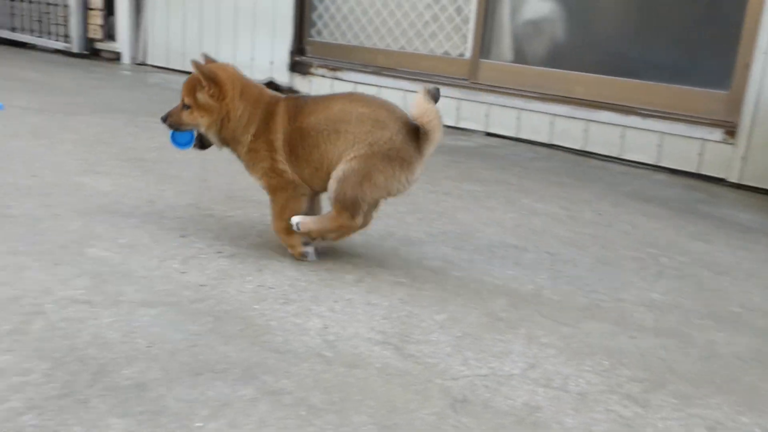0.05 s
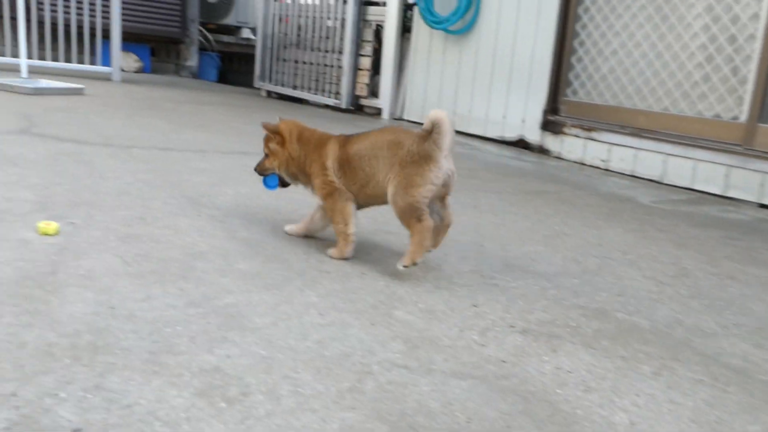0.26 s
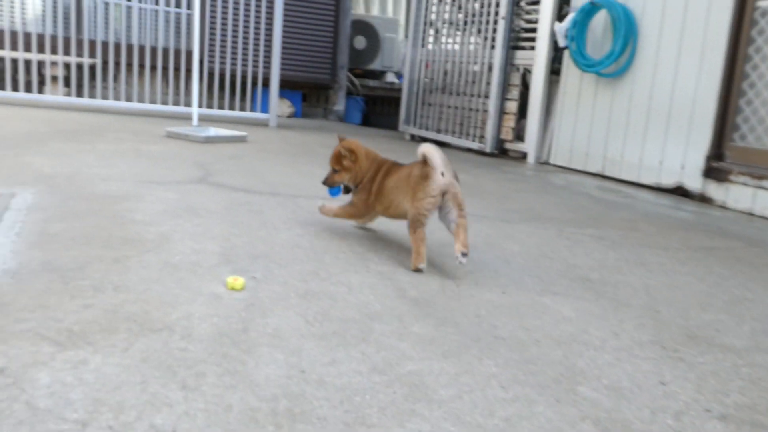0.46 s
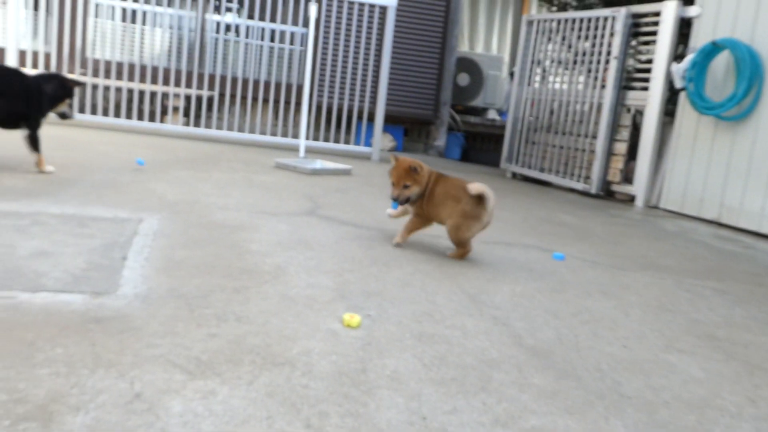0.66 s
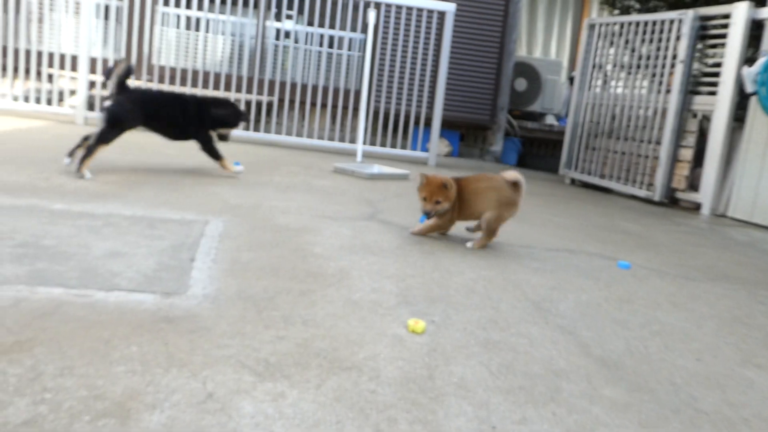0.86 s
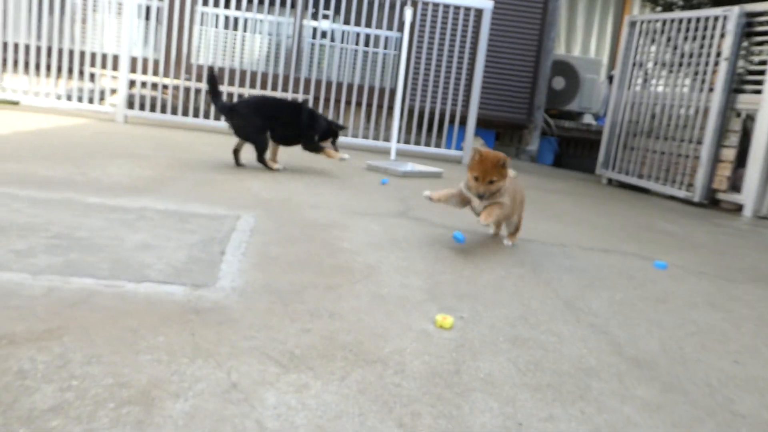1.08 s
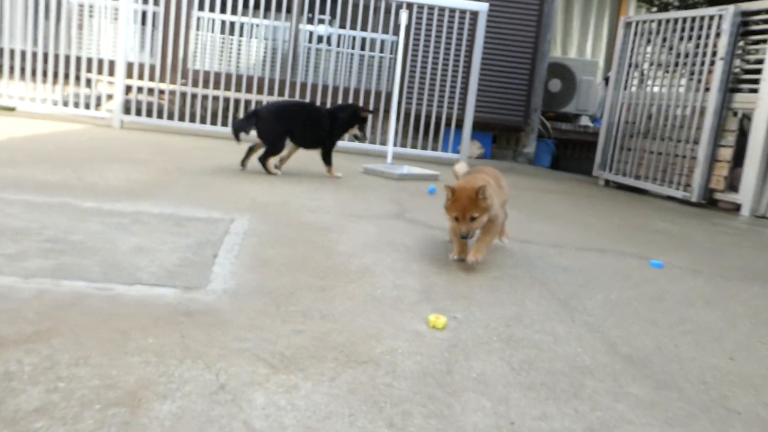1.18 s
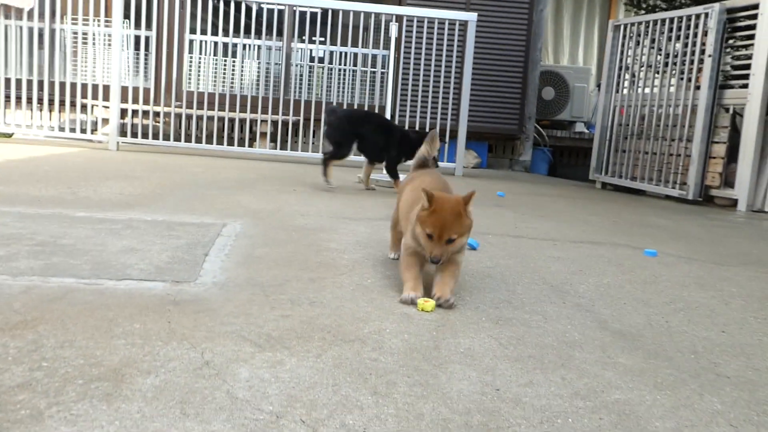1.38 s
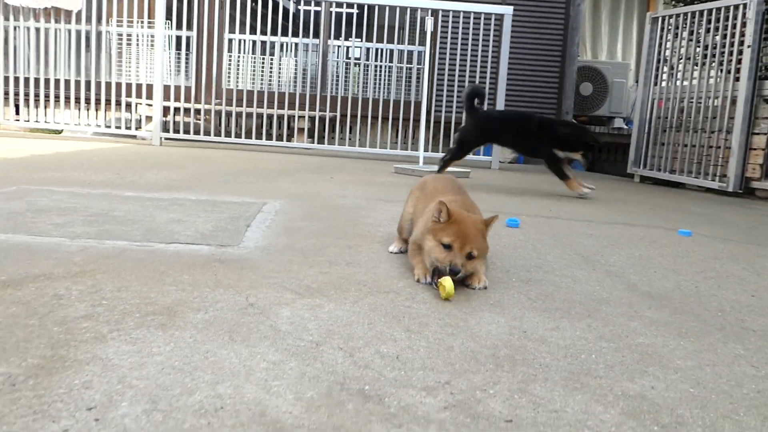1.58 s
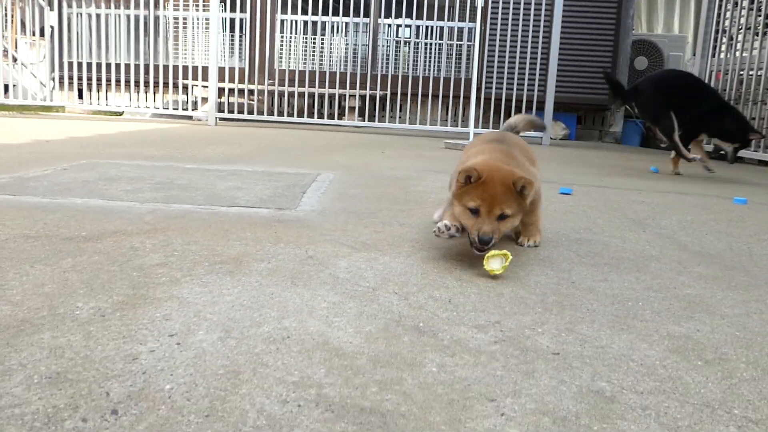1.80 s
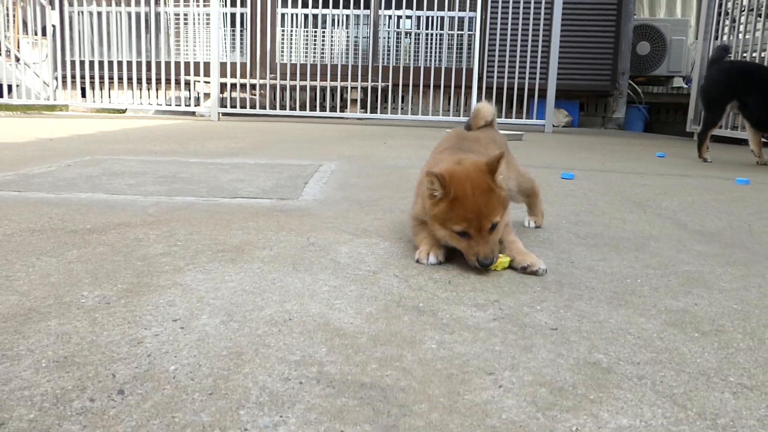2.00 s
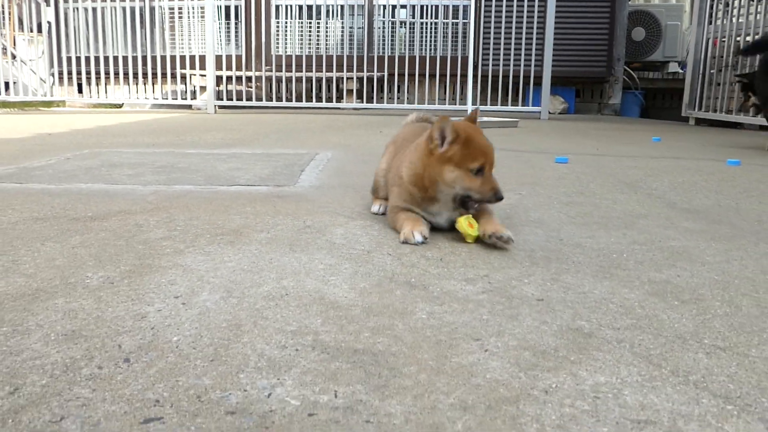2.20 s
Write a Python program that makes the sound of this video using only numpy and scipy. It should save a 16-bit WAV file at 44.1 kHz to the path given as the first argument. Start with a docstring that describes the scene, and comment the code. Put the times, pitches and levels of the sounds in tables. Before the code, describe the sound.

A hollow plastic bottle cap clacks irregularly in a puppy's mouth, loudest around 1 and 1.6 seconds, with short wall echoes. Paws scuff and claws tick on concrete, moving from left to right. A cap slides with a faint squeak at 1.4 seconds, then a second cap knocks dully, strongest near 2 seconds. Teeth creak softly on plastic just after. Quiet outdoor noise and a faint hum continue underneath.

```python
"""A puppy pads into a run about a walled concrete yard, over soft outdoor noise and a faint hum.
Its paws scuff and its claws tick; the hollow plastic bottle cap in its mouth clacks and rings briefly.
The walls answer every click, and the loudest ones push the recorder's limiter down.
As the puppy moves from left to right, a cap slides with a faint squeak; then it paws at a second cap,
which knocks dully on the ground. Near the end its teeth drag over the plastic in soft creaks."""
import sys
import numpy as np
from scipy import signal
from scipy.fft import rfft, irfft
from scipy.io import wavfile
from scipy.ndimage import uniform_filter1d, minimum_filter1d

SR = 44100
rng = np.random.default_rng(int(sys.argv[2]) if len(sys.argv) > 2 else 0)


def waveform_to_disk(signal):
    """Save audio, clipped to [-1, 1], as 16-bit WAV at the path in sys.argv[1]."""
    frames = np.transpose(np.atleast_2d(signal))
    scaled = np.clip(frames, -1, 1) * 32767
    samples = np.round(scaled).astype(np.int16)
    wavfile.write(sys.argv[1], SR, samples)


N = 99225

# outdoor noise spectrum: f/Hz, relative level/dB
AIR_SPECTRUM = [(20, -9), (55, 4), (80, 3.5), (125, -2.5), (170, -2.5), (270, 1), (400, -2.5), (660, -2),
                (1200, -6), (2500, -6.5), (5000, -13.5), (10000, -22), (16000, -25)]
# steady hum: f/Hz, level/dB
HUM_TONES = [(123, -63), (296, -63), (665, -60.5)]
# likeness of left and right, for outdoor noise and for echoes: f/Hz, coherence
AIR_COHERENCE = [(60, 0.39), (200, 0.049), (600, 0.13), (1600, 0.41), (5000, 0.61), (15000, 0.09)]
YARD_COHERENCE = [(200, 0.28), (1600, 0.56), (4700, 0.85), (15000, 0.29)]

# strokes of friction: t/s, duration/s, level/dB
FOOTFALLS = [(.05, 0.043, -48.5), (.45, 0.068, -48), (.55, 0.076, -44), (.76, 0.34, -48.5),
             (1.1, 0.18, -54), (1.45, 0.25, -55)]   # soft pads
SCRAPE_STROKES = [(.062, 0.077, -43.5), (.515, 0.069, -45), (.590, 0.043, -35), (1.843, 0.0076, -44)]   # low and hollow
SCUFF_STROKES = [(.108, 0.025, -39.5), (.155, 0.1, -42.5), (.398, 0.037, -41.5), (.455, 0.07, -40.5),
                 (.478, 0.0029, -36), (.528, 0.06, -43), (.538, 0.0036, -36.5), (.575, 0.2, -51),
                 (.755, 0.022, -42), (.812, 0.0082, -39), (.897, 0.093, -45.5), (1.118, 0.044, -35),
                 (1.130, 0.0015, -25), (1.186, 0.0019, -27), (1.243, 0.031, -32), (1.447, 0.064, -35),
                 (1.540, 0.0064, -34.5), (1.828, 0.065, -37), (2.03, 0.012, -38.5), (2.165, 0.16, -46)]   # paws and claws on grit
SQUEAK_STROKES = [(1.412, 0.05, -40)]   # the cap sliding
GNAW_STROKES = [(2.058, 0.017, -34.5), (2.081, .008, -33), (2.113, 0.016, -32), (2.126, 0.05, -45),
                (2.155, .01, -29), (2.168, 0.027, -43)]   # teeth on the cap
# their spectra: f/Hz, relative level/dB
FOOTFALL_SPECTRUM = [(60, -7), (120, -16), (190, -2.5), (450, -6.5), (1500, -13), (5000, -40)]
SCRAPE_SPECTRUM = [(200, -18), (600, 6.5), (980, 12.5), (1600, 0), (2300, 11.5), (3200, -1), (8000, -30)]
SCUFF_SPECTRUM = [(300, -9), (1500, -3.5), (3000, -2.5), (6000, 0), (8000, -1.5), (10500, 5), (13000, -8),
                  (16000, -15)]
SQUEAK_SPECTRUM = [(4500, -19), (5300, -14), (5600, 1), (6100, -39)]
GNAW_SPECTRUM = [(1500, -28), (2050, 4), (2300, 6), (2600, 5), (3700, -12), (4650, 7), (5400, -10),
                 (9000, -19)]

# ringing clacks of the cap, and two distinct wall echoes of them (at 0.666 s and 1.3056 s):
# t/s, level/dB, pitch f/Hz, then relative to the level: knock/dB, pop/dB, crack/dB, yard/dB
CLACKS_AND_ECHOES = [ (0.096, -20, 4650, -8, -13, -21, 6), (0.1859, -26.5, 4320, -2, -20, -5.5, 0),
                     (0.2342, -4.5, 4683, 0.5, -0.5, -11.5, 1.5), (0.4, -27.5, 4850, -25, -30, -5, 10),
                     (0.497, -16.5, 4780, -10, -28, -15.5, 2.5),
                     (0.6298, -0.5, 4690, -16, -11.5, -13, -0.5), (0.666, -13, 4650, -22, -27, -20, -4),
                     (0.7692, -17.5, 4680, -10, -24, -27, 3.5), (0.9802, 6, 4678, -13.5, -32, -15.5, -1),
                     (0.9842, 2.5, 4550, -33, -38, -7, -6), (.9945, -8, 4500, -18, -35, -28, 1),
                     (1.1347, -13, 4810, -15, -1.5, -16, -5), (1.1695, -10, 4620, -16.5, -40, -16, -1),
                     (1.2964, -4, 4726, -21.5, -48, -23.5, -2.5), (1.3056, -20, 4700, -4.5, -5, -40, 5),
                     (1.368, -11, 4650, -8, -32, -21.5, -3.5), (1.409, -18.5, 4760, -5.5, -10, -17.5, 0.5),
                     (1.4297, -24, 4370, -27, -19, -21, 11.5), (1.5321, -23.5, 4700, -20, -30, -30, 7),
                     (1.5929, -14, 4660, -11, -4.5, -40, 7), (1.608, 3, 4734, -13, -17.5, -17.5, -3),
                     (1.6126, -11, 4350, -10, -40, -35, -12), (1.6711, -1, 4710, -3, -11.5, -14, -1.5),
                     (1.6763, -6, 4660, -4, -35, -10, -14)]
# dull knocks on concrete: t/s, level/dB, pitch f/Hz, then relative to the level: crack/dB, yard/dB
GROUND_KNOCKS = [ (.5913, -21.5, 2140, -32, -19), (0.769, -21, 2540, -8.5, 2), (0.8934, -31, 3770, -4, -1),
                 (1.4596, -11.5, 2870, -22, -1), (1.4636, -9, 3020, -19, -10),
                 (1.4868, -19, 3570, -15, -28), (1.5725, -18, 3730, -10, -9), (1.62, -17, 2860, -29, -16),
                 (1.9402, -2, 3190, -24, -17), (1.9758, -3.5, 3340, -19, -8), (1.9793, -9.5, 3000, -21, -7),
                 (1.9813, -16.5, 2930, -17, 4.5), (2.0315, -21.5, 4080, -28, -3),
                 (2.144, -30, 4300, -24, 9), (2.2470, -21.5, 3270, -17, 10)]
# normal modes of a cap: f/Hz before stretching, level/dB, T60/s
HOLLOW_MODES = [(3410, -5, 0.0033), (4047, 5.5, 0.0029), (4684, 2, 0.01), (4830, -15, 0.01),
                (1556, -30, 0.053)]   # neighbours swing in opposition
DAMPED_MODES = [(2223, -10, 0.0094), (2602, -2.5, 0.0048), (3400, 4, 0.0042), (4070, -2.5, 0.0021),
                (5440, -12.5, 0.0069)]   # damped by the ground
HARD_CONTACT_MODES = [(7180, -4.5, 0.012)]   # level relative to the crack
# spectrum of the crack of contact: f/Hz, relative level/dB
CRACK_SPECTRUM = [(300, -14), (1500, -4), (5500, 7.5), (8500, 6.5), (11000, 4.5), (13000, -4.5),
                  (16000, -25.5)]

# where the puppy is: t/s, left minus right level/dB
PUPPY_PAN = [(.2, 6.5), (.5, 4), (.63, 4.5), (.98, 1.5), (1.3, -2.5), (1.599, -4), (2.199, -1.5)]
# reverberation time: f/Hz, T60/s
YARD_DECAY = [(300, 0.88), (2500, 0.34), (4700, 0.59), (8000, 0.42), (15000, 0.19)]
# spectrum of the echoes: f/Hz, relative level/dB
YARD_SPECTRUM = [(200, -28), (1500, 1.5), (3000, 2.5), (4700, -2), (7200, 6), (11000, 6), (15000, 4)]

AIR_DB = -43.5
HOLLOW_HZ, DAMPED_HZ = 4650, 3200   # pitches at which the modes are unstretched
POP_HZ, POP_T60_S, CRACK_T60_S = 1200, 0.0015, 0.0071
HIT_SAMPLES, RADIATES_ABOVE_HZ = 2048, 1210
WALL_DELAY_S, YARD_DB, FRICTION_TO_WALLS_DB = 0.006, -2.0, -8
LIMIT_DB, LIMIT_ATTACK_S, RELEASE_DB_PER_S = 1.5, 0.00097, 26.5
LOW_CUT_HZ, HIGH_CUT_HZ = 110, 16400


def from_db(db):
    """Amplitude grows tenfold for every 20 dB."""
    return 10 ** (np.asarray(db) / 20)


def at_hz(points, hz):
    """Interpolation of a table on a logarithmic frequency axis."""
    f, values = np.transpose(points)
    return np.interp(np.log(np.maximum(hz, 1)), np.log(f), values)


def rms_one(x):
    """Normalisation to unit mean power."""
    return x / np.sqrt(np.mean(x ** 2) + 1e-20)


def colour(x, spectrum):
    """Linear filtering: each frequency is weighted by a spectrum given in dB."""
    return irfft(rfft(x) * from_db(at_hz(spectrum, np.fft.rfftfreq(N, 1 / SR))), N)


def widen(mid, side, coherence):
    """Partial coherence: left and right are the weighted sum and difference of unrelated sounds."""
    alike = np.clip(at_hz(coherence, np.fft.rfftfreq(N, 1 / SR)), 0, .99)
    return irfft(np.sqrt(1 + alike) * rfft(mid) + np.sqrt(1 - alike) * rfft(side) * [[1], [-1]], N)


def add(track, start_s, sound):
    """Superposition: a sound adds to what the track already holds."""
    start = max(int(start_s * SR), 0)
    part = track[start:start + len(sound)]
    part += sound[:len(part)]


def grains(per_s, spread_db):
    """Shot noise: independent impulses of random sign, their sizes scattered by spread_db."""
    sizes = from_db(spread_db * np.minimum(rng.exponential(1, N), 4)) * rng.choice([-1, 1], N)
    return rms_one(sizes * (rng.random(N) < per_s / SR))


def background():
    """Stationary sound: a continuous spectrum of outdoor noise plus the line spectrum of a hum."""
    air = rms_one(colour(widen(*rng.standard_normal((2, N)), AIR_COHERENCE), AIR_SPECTRUM))
    t = np.arange(N) / SR
    hum = sum(from_db(db) * np.sqrt(2) * np.sin(2 * np.pi * (hz * t + rng.random()))
              for hz, db in HUM_TONES)
    return from_db(AIR_DB) * air + hum


def friction(strokes, spectrum):
    """Friction noise: many tiny impacts under a pressure that swells quickly and eases off."""
    pressure = np.zeros(N)
    for start_s, duration_s, db in strokes:
        progress = np.linspace(0, 1, max(int(duration_s * SR), 2))
        add(pressure, start_s, from_db(db) * np.sin(np.pi * progress ** 0.54))
    return pressure * rms_one(colour(grains(per_s=1400, spread_db=3.5), spectrum))


def yard(sound):
    """Reverberation: after a short gap, scattered wall echoes decay exponentially, band by band."""
    t = np.arange(N) / SR
    mid, side = grains(per_s=2400, spread_db=0), grains(per_s=2400, spread_db=0)
    echoes = rfft(widen(mid, side, YARD_COHERENCE))
    centres_hz = np.geomspace(200, 16000, 10)
    response = 0
    for hz, share in zip(centres_hz, np.eye(len(centres_hz))):
        band = irfft(echoes * at_hz(np.c_[centres_hz, share], np.fft.rfftfreq(N, 1 / SR)), N)
        response += band * from_db(at_hz(YARD_SPECTRUM, hz) - 60 * t / at_hz(YARD_DECAY, hz))
    response = rms_one(response * (t > WALL_DELAY_S)) / np.sqrt(N)   # unit energy
    return from_db(YARD_DB) * signal.fftconvolve(sound[None], response, axes=1)[:, :N]


def ring(modes, stretch):
    """Free vibration: damped sinusoids of alternating sign, each frequency multiplied by stretch."""
    t = np.arange(HIT_SAMPLES) / SR
    return sum((-1) ** k * from_db(db - 60 * t / t60) * np.sin(2 * np.pi * hz * stretch * t)
               for k, (hz, db, t60) in enumerate(modes))


def radiated(modes, stretch):
    """Radiation efficiency: a body as small as a cap gives off little of its ring as bass."""
    bass_loss = signal.butter(2, RADIATES_ABOVE_HZ, "high", fs=SR, output="sos")
    return signal.sosfilt(bass_loss, ring(modes, stretch))


def clacks():
    """Resonance and reflection: the cap's ringing, knocking clacks, and two distinct wall echoes."""
    knock = radiated(DAMPED_MODES, stretch=0.912)
    pop = ring([(POP_HZ, 0, POP_T60_S)], stretch=1)   # short low pop of overload distortion on some
    for start_s, db, hz, knock_db, pop_db, crack_db, yard_db in CLACKS_AND_ECHOES:
        body = radiated(HOLLOW_MODES, hz / HOLLOW_HZ) + from_db(knock_db) * knock - from_db(pop_db) * pop
        yield start_s, db, body, crack_db, yard_db


def knocks():
    """Contact damping: against the concrete, a cap's modes die within milliseconds."""
    for start_s, db, hz, crack_db, yard_db in GROUND_KNOCKS:
        yield start_s, db, radiated(DAMPED_MODES, hz / DAMPED_HZ), crack_db, yard_db


def transients(events):
    """Brief sounds have broad spectra: each click gains a crack, sent direct and to the walls."""
    direct, to_walls = np.zeros((2, N))
    decay = from_db(-60 * np.arange(HIT_SAMPLES) / SR / CRACK_T60_S)
    hiss = rms_one(colour(rng.standard_normal(N), CRACK_SPECTRUM))
    high_ring = ring(HARD_CONTACT_MODES, stretch=0.98)
    for start_s, db, body, crack_db, yard_db in events:
        for track, share_db in ((direct, 0), (to_walls, yard_db)):
            crack = decay * np.roll(hiss, rng.integers(N))[:HIT_SAMPLES] + high_ring
            add(track, start_s, from_db(db + share_db) * (body + from_db(crack_db) * crack))
    return direct, to_walls


def scene():
    """Direct and reverberant fields add; a level difference carries the puppy from left to right."""
    clicks, clicks_to_walls = transients([*clacks(), *knocks()])
    rubbing = (friction(FOOTFALLS, FOOTFALL_SPECTRUM)
               + friction(SCRAPE_STROKES, SCRAPE_SPECTRUM)
               + friction(SCUFF_STROKES, SCUFF_SPECTRUM)
               + friction(SQUEAK_STROKES, SQUEAK_SPECTRUM)
               + friction(GNAW_STROKES, GNAW_SPECTRUM))
    pan_db = np.interp(np.arange(N) / SR, *np.transpose(PUPPY_PAN))
    direct = (clicks + rubbing) * from_db(pan_db / 2 * [[1], [-1]])
    echoes = yard(clicks_to_walls + from_db(FRICTION_TO_WALLS_DB) * rubbing)
    return direct + echoes + background()


def record(dry):
    """Peak limiting: gain drops at loud clicks and recovers; overshoots clip, rumble and top are cut."""
    peak_db = 20 * np.log10(np.abs(dry).max(axis=0) + 1e-9)
    over_db = np.maximum(peak_db - LIMIT_DB, 0)
    recovery_db = RELEASE_DB_PER_S * np.arange(N) / SR
    held_db = np.maximum.accumulate(over_db + recovery_db) - recovery_db
    attack_samples = int(LIMIT_ATTACK_S * SR)
    ahead_db = -minimum_filter1d(-held_db, attack_samples)   # ducking starts just before the peak
    duck_db = uniform_filter1d(uniform_filter1d(ahead_db, attack_samples), attack_samples)
    limited = np.clip(dry * from_db(-duck_db), -1, 1)
    limited = signal.sosfilt(signal.butter(3, LOW_CUT_HZ, "high", fs=SR, output="sos"), limited)
    return signal.sosfilt(signal.cheby2(16, 60, HIGH_CUT_HZ, fs=SR, output="sos"), limited)


dry = scene()
out = record(dry)
waveform_to_disk(out)
```